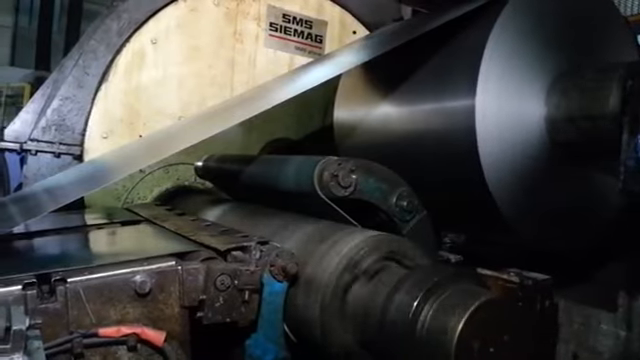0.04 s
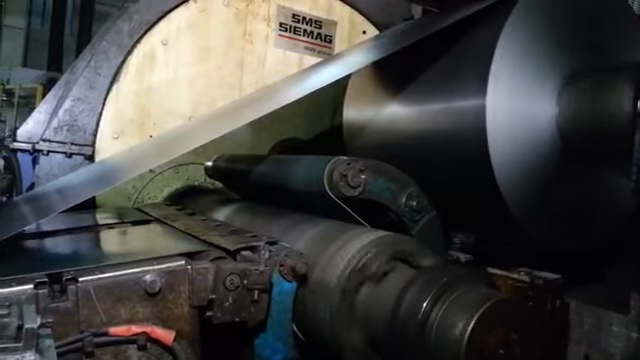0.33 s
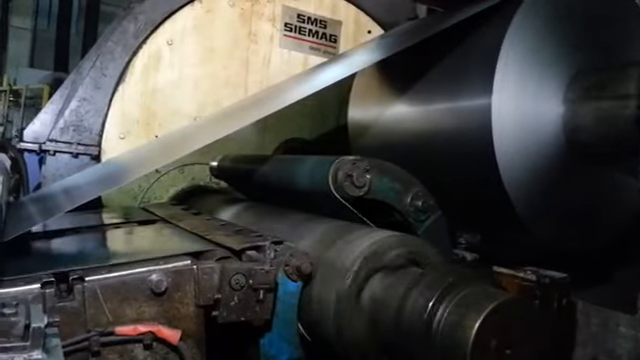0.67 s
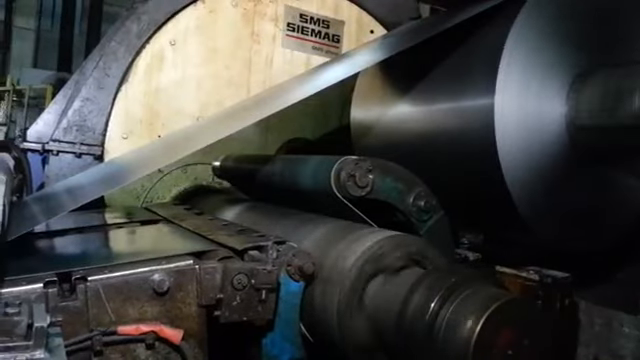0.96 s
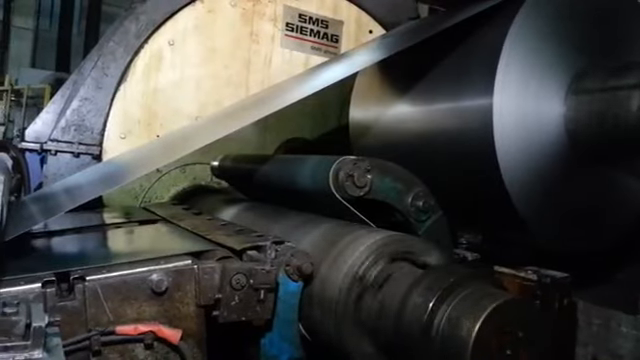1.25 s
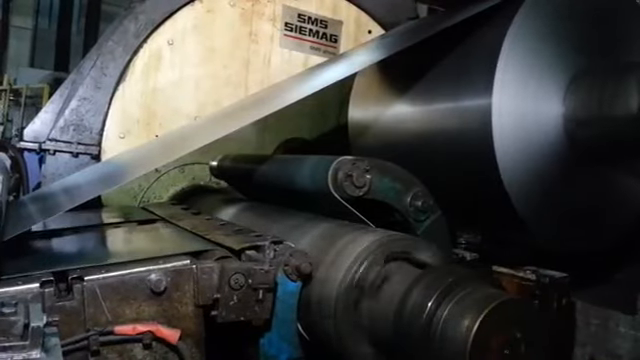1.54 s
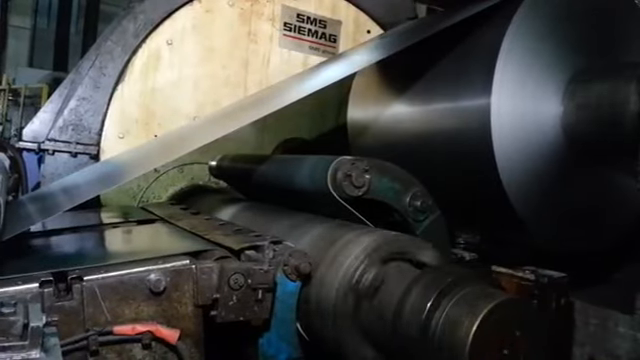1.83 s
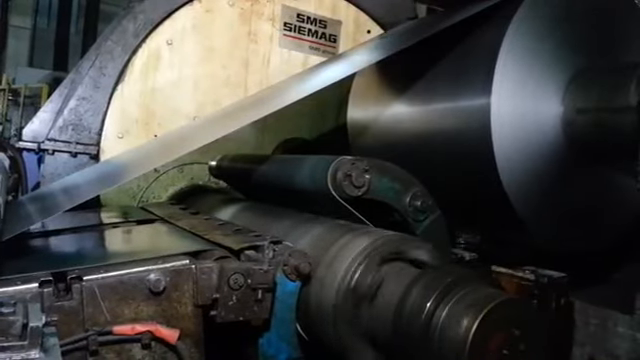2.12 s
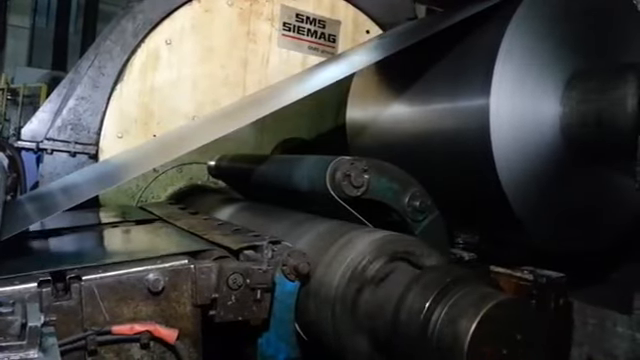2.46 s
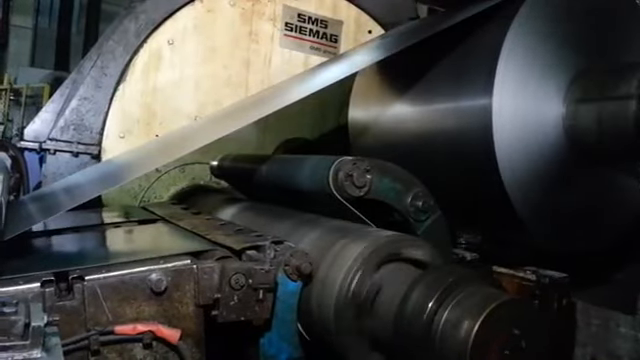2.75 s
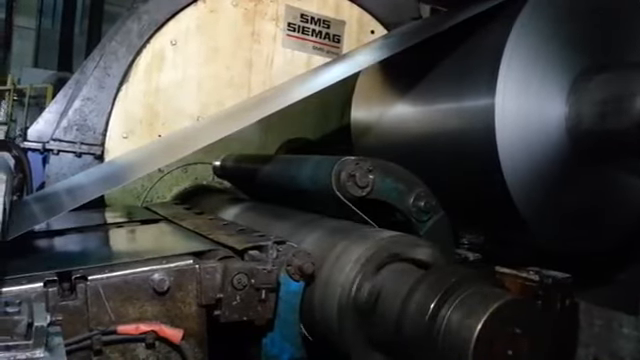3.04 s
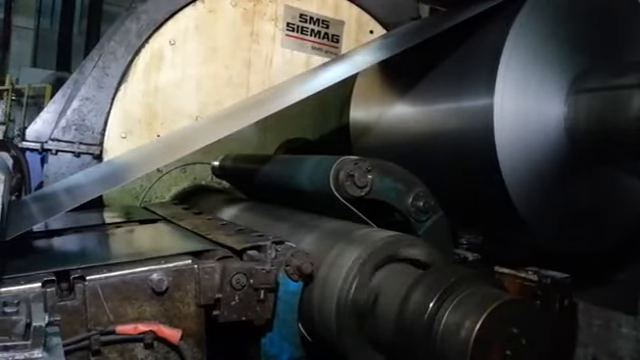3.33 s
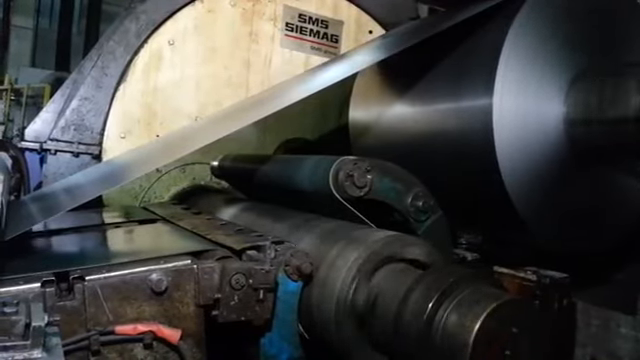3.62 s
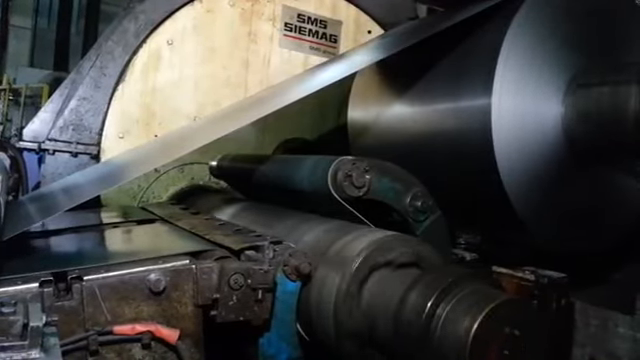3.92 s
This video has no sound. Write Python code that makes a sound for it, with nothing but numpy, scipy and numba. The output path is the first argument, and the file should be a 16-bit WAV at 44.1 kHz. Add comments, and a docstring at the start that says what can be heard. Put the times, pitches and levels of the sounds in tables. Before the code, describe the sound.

A large steel coiling machine runs with a constant, dense roar and a high hiss of sliding metal strip, both leaning to the right. Beneath them are a soft hum, a ringing frame, a few faint thumps and a gradually strengthening whine. In the last second or so, loud irregular wind gusts hit the microphone with hoarse little whistles and low thuds, and the machine ducks slightly under them.

```python
"""A steel strip winds onto a spinning coil in a mill hall. From the start the rollers roar, the frame
rings and the drive hums, while friction makes the strip sizzle to the right, swelling a little with
each turn. The gear whine grows with the load, and faint low thumps sound under the roar. At 5.4 s
the whine starts to recede; then gusts buffet the microphone ports, shedding eddies that rush and
whistle amid heavier thuds, and the gain control pushes the machine down under them."""
import sys
import numpy as np
from scipy import signal
from scipy.fft import irfft
from scipy.io import wavfile
from scipy.ndimage import uniform_filter1d, minimum_filter1d
from numba import njit

SR = 44100
rng = np.random.default_rng(int(sys.argv[2]) if len(sys.argv) > 2 else 0)


def waveform_to_disk(signal):
    """Save audio, clipped to [-1, 1], as 16-bit WAV at the path in sys.argv[1]."""
    frames = np.transpose(np.atleast_2d(signal))
    scaled = np.clip(frames, -1, 1) * 32767
    samples = np.round(scaled).astype(np.int16)
    wavfile.write(sys.argv[1], SR, samples)


N = 302967
TIME, FREQ = np.arange(N) / SR, np.fft.rfftfreq(N, 1 / SR) + 1e-3
PORT_LAG_S = 16.5 / SR  # sound from the right reaches the left microphone port this much later


# spectrum of the roller roar (frequency [Hz], relative density [dB])
ROAR_SPECTRUM = [(40, -85), (70, -72), (110, -55), (160, -29), (210, -13), (260, -4.5), (320, -7.5),
                 (500, -1.5), (800, -1), (1300, 3), (2000, 2), (2700, -1), (4000, 1.5), (5600, -30),
                 (6600, -23)]
# the roar at the two ports (frequency [Hz], coherence [0-1], left minus right [dB])
ROAR_STEREO = [(100, 0, 16), (264, 0.77, -6), (640, 0.6, -2.5), (960, 0.57, -3), (1700, 0.39, -1.5),
               (2680, 0.28, -4.5), (5000, 0.35, -3.5)]

def rollers(roar_db=-16.0, wander_db=0.89, direct_hz=850):
    """Rolling noise: the bass forms a diffuse field, the treble arrives partly direct from the right."""
    coherence, balance_db = over_freq(ROAR_STEREO)
    lag = PORT_LAG_S / (1 + (direct_hz / FREQ) ** 6)
    colour = undb(over_freq(ROAR_SPECTRUM)[0])
    roar = irfft(ports(coherence, lag) * colour * pan(balance_db), N)
    return level(roar, roar_db) * undb(wander_db * walk(27.0))


# strip sliding over the rolls (frequency [Hz], relative density [dB])
SIZZLE_SPECTRUM = [(2200, -39), (3200, -9), (3900, 3), (4500, 7), (5100, 4), (5900, -1.5), (6500, -20.5)]
# high treble hiss to the right (frequency [Hz], relative density [dB], left minus right [dB])
HISS_SPECTRUM = [(5270, -46, -4), (6170, -0.5, -11), (8700, -0.5, -8), (9700, -2, -10.5), (12000, -3, -5.5),
                 (13700, -5, 0), (14400, -32.5, -13)]

def strip(rub_db=-16.5, ease_db_per_s=0.18, coil_hz=2.6, turn_db=0.4, flutter_db=0.66):
    """Sliding friction: a sizzle flutters with tension and eases as the coil grows; a hiss follows it."""
    sizzle_colour = undb(over_freq(SIZZLE_SPECTRUM)[0])
    sizzle = irfft(ports(coherence=0.081, lag_s=PORT_LAG_S) * sizzle_colour, N) * pan(-10)
    hiss_db, balance_db = over_freq(HISS_SPECTRUM)
    hiss = irfft(ports(coherence=0.97) * undb(hiss_db) * pan(balance_db), N)
    turn = np.cos(2 * np.pi * coil_hz * (TIME - .12))
    rubbing = undb(rub_db - ease_db_per_s * TIME + turn_db * turn + flutter_db * walk(17))
    return rubbing * (level(sizzle, 0) + level(hiss, -4) * undb(0.46 * walk(7.9)))


# gusts (start [s], rise [s], hold [s], level [dB], lower edge [Hz], upper edge at full speed [Hz])
AIR_GUSTS = [ (5.581, 0.04, 0.19, -15, 398, 730), (5.657, 0.035, 0.025, -12.5, 680, 1380),
             (5.835, 0.02, 0.03, -14, 520, 950), (5.886, 0.0063, 0.038, -3.5, 534, 1060),
             (5.896, 0.012, 0.062, -7.5, 950, 1630), (6.06, 0.041, 0.095, -17, 448, 1130),
             (6.264, 0.022, 0.038, -0.5, 553, 1950), (6.285, 0.01, 0.018, -9, 1450, 2100),
             (6.405, 0.037, 0.041, -4.5, 606, 1940), (6.494, .006, 0.034, -5, 1700, 10000),
             (6.473, 0.014, 0.16, -7, 393, 4600), (6.626, 0.11, .2, -4, 335, 1520)]
# response of the port cavities to moving air (frequency [Hz], relative gain [dB])
PORT_RESPONSE = [(250, 2.5), (520, 4), (1000, 3), (1700, 1.5), (2700, 0), (4300, -3), (6000, -9),
                 (12000, -4)]
# wind at the two ports (frequency [Hz], coherence [0-1], left minus right [dB])
WIND_STEREO = [(300, 0.87, -1.5), (750, 0.67, 0.5), (1260, 0.52, 0.5), (3000, 0.4, 0), (9100, 0.7, -2)]

def wind(buffet_db=1.14, low_cut_hz=180, edge_exponent=0.13):
    """Turbulence at the ports: faster air sheds smaller eddies and so makes a brighter rush."""
    coherence, balance_db = over_freq(WIND_STEREO)
    colour = undb(over_freq(PORT_RESPONSE)[0])
    air = level(irfft(ports(coherence) * colour * pan(balance_db), N), 0)
    hz, t, bands = signal.stft(air, SR, nperseg=512)
    power = 0
    for start, rise, hold, db, low_hz, high_hz in AIR_GUSTS:
        speed = air_speed(t - start, rise, hold, high_hz)
        edge_hz = 1 + high_hz * speed ** edge_exponent
        band_share = np.average(eddies(FREQ, low_hz, high_hz) ** 2, weights=colour ** 2)
        gust = undb(db) * speed * eddies(hz[:, None] + 1, low_hz, edge_hz)
        power = power + gust ** 2 / band_share
    rush = signal.istft(bands * np.sqrt(power), SR, nperseg=512)[1][:, :N]
    low_cut = signal.butter(8, low_cut_hz, "high", fs=SR, output="sos")
    return signal.sosfilt(low_cut, rush * undb(buffet_db * walk(51)))


def air_speed(age, rise, hold, high_hz, surge_db=1, settle_s=0.012, sag_db_per_s=10.5):
    """Transient flow: a gust's relative speed rises, overshoots, sags and decays exponentially."""
    fall_s = 0.094 * (1400 / high_hz) ** 0.46  # bright gusts die sooner
    since_peak = np.maximum(age - rise, 0)
    sag = undb(surge_db * np.exp(-since_peak / settle_s) - sag_db_per_s * since_peak)
    decay = np.exp(-np.maximum(since_peak - hold, 0) / fall_s)
    return np.clip(age / rise, 0, 1) * sag * decay


def eddies(hz, low_hz, high_hz, peak_db=3, hiss_db=-40):
    """Eddy spectrum: a band with a shedding peak just under its upper edge and a faint hiss beyond."""
    lower_slope = 1 / np.sqrt(1 + (low_hz / hz) ** 5.12)
    upper_slope = 1 / np.sqrt(1 + (hz / high_hz) ** 5.48)
    shedding = undb(peak_db * np.exp(-(np.log(hz / (0.95 * high_hz)) / 0.051) ** 2))
    return lower_slope * (upper_slope * shedding + undb(hiss_db))


# tones at the ports (start [s], length [s], level [dB], first pitch [Hz], last pitch [Hz])
VORTEX_TONES = [ (5.67, 0.056, -17, 695, 686), (5.758, 0.08, -26, 625, 477), (5.885, 0.071, -16, 613, 585),
                (5.9, 0.113, -11, 800, 890), (6.07, 0.064, -19, 950, 1030), (6.283, 0.041, -4, 1840, 2020),
                (6.275, 0.04, -3, 1660, 1640), (6.305, 0.057, -8, 1362, 1330),
                (6.411, 0.077, -13, 1165, 1274), (6.46, 0.061, -9, 703, 636), (6.70, 0.045, -10, 516, 540),
                (6.724, 0.047, -7, 989, 1072)]

def whistles(hoarseness=0.47, hoarse_hz=70):
    """Vortex lock-in: eddies briefly shed in step, giving hoarse tones that swell, glide and fade."""
    rough = roughness(hoarseness, hoarse_hz)
    out = np.zeros((2, N))
    for start, length, db, first_hz, last_hz in VORTEX_TONES:
        span = (TIME > start) & (TIME < start + length)
        progress = (TIME[span] - start) / length
        pitch_hz = first_hz + (last_hz - first_hz) * progress
        phase = 2 * np.pi * (np.cumsum(pitch_hz) / SR + rng.random())
        tone = np.real(np.exp(1j * phase) * rough[:, span])
        out[:, span] += undb(db) * np.sin(np.pi * progress) * tone
    return out


def gear_mesh(mesh_hz=800, wobble_hz=0.27, start_db=-32.5, full_load_s=5.4):
    """Tooth meshing: a whine, modulated by uneven teeth, grows with the load and then recedes."""
    growth_db_per_s, ease_db_per_s = 0.8, 8
    phase = 2 * np.pi * np.cumsum(mesh_hz + wobble_hz * walk(6.4)) / SR
    whine = np.real(np.exp(1j * phase) * roughness(depth=0.62, rate_hz=22))
    growth_db = growth_db_per_s * np.minimum(TIME, full_load_s)
    ease_db = ease_db_per_s * np.maximum(TIME - full_load_s, 0)
    return level(whine, start_db) * undb(growth_db - ease_db) * pan(-4)


# modes of frame and gears (frequency [Hz], half-width [Hz], relative level [dB], left minus right [dB])
FRAME_MODES = [(257, 16.5, -35, -3), (408, 11, -39, -3), (506, 16, -39.5, -4), (660, 16, -39.5, -4),
               (1570, 69, -40.5, -13), (1860, 11, -41.5, -16), (2040, 25, -33.5, 5)]

def frame(ring_db=-33.0, unrest_db=3.0, lowest_hz=190):
    """Forced resonance: rolling contact drives narrow modes unevenly; deep bass radiates poorly."""
    modes = sum(undb(db) * pan(pan_db) / np.sqrt(width) / (1 + ((FREQ - hz) / width) ** 2)
                for hz, width, db, pan_db in FRAME_MODES)
    radiation = 1 / (1 + (lowest_hz / FREQ) ** 4)
    coherence = over_freq(ROAR_STEREO)[0]
    ringing = irfft(ports(coherence) * modes * radiation, N)
    return level(ringing, ring_db) * undb(unrest_db * walk(14))


# drive hum and a close cluster of gear tones (frequency [Hz], level [dB], left minus right [dB])
DRIVE_TONES = [(261.5, -46.5, 1), (420, -41, -1), (1496, -50, -7), (1571, -41, -8), (1582, -41, -10),
               (1590, -46, 0)]

def hum(fade_db=0.5):
    """Beating: steady drive tones, the close ones interfering, each slowly swelling and fading."""
    out = 0
    for hz, db, pan_db in DRIVE_TONES:
        tone = np.sqrt(2) * np.sin(2 * np.pi * (hz * TIME + rng.random()))
        out = out + tone * undb(db + fade_db * walk(1.4)) * pan(pan_db)
    return out


# brief low thuds (time [s], level [dB], left minus right [dB])
LOW_THUDS = [(0.36, -44, -6), (0.53, -42, -6), (1.79, -46, -6), (2.1, -48, -6), (2.74, -50, -6),
             (3.83, -43, -6), (5.615, -43, -6), (5.985, -44, -6), (6.47, -25, 8), (6.521, -30, -6),
             (6.63, -36, -9), (6.82, -41, -11)]

def thuds(thud_hz=70, decay_s=0.0092):
    """Damped oscillation: faint low thumps under the roar, heavier low thuds during the gusts."""
    out = 0
    for start, db, pan_db in LOW_THUDS:
        age = np.clip(TIME - start, 0, .5)
        swing = np.sin(2 * np.pi * thud_hz * age) * np.exp(-age / decay_s)
        out = out + undb(db) * swing * pan(pan_db)
    return out


def undb(db):
    """Decibels to amplitude ratio."""
    return 10 ** (np.asarray(db) / 20)


def level(x, db):
    """Scaling to an rms level."""
    return x * undb(db) / np.sqrt(np.mean(x ** 2))


def over_freq(rows):
    """Interpolation of a table's columns on a log-frequency axis."""
    hz, *columns = np.transpose(rows)
    return [np.interp(np.log(FREQ), np.log(hz), c) for c in columns]


def pan(db):
    """Left and right gains for a level difference, left minus right."""
    return undb(np.array([[.5], [-.5]]) * db)


def white(count):
    """Spectra of independent white noises."""
    return rng.standard_normal((count, len(FREQ))) + 1j * rng.standard_normal((count, len(FREQ)))


def ports(coherence, lag_s=0):
    """Partial coherence: two noise spectra with a shared part, delayed on the left, and a diffuse part."""
    delay = np.exp(-2j * np.pi * FREQ * lag_s * np.array([[1], [0]]))
    return np.sqrt(coherence) * white(1) * delay + np.sqrt(1 - coherence) * white(2)


def walk(rate_hz):
    """Low-pass noise: a smooth random wander of unit rms."""
    return level(irfft(white(1)[0] * np.exp(-(FREQ / rate_hz) ** 2), N), 0)


def roughness(depth, rate_hz):
    """Random modulation of amplitude and phase, independent at each port."""
    return 1 + depth * np.array([walk(rate_hz) + 1j * walk(rate_hz) for port in range(2)])


@njit
def follow(power, attack, release):
    """Envelope detection: smoothed power that rises fast and falls slowly."""
    out, envelope = np.empty(len(power)), 0.
    for i in range(len(power)):
        envelope += (power[i] - envelope) * (attack if power[i] > envelope else release)
        out[i] = envelope
    return out


def limit(x, ceiling=.93, size=71):
    """Look-ahead limiting: the gain eases down just before each peak."""
    safe_gain = 1 / np.maximum(np.abs(x).max(axis=0) / ceiling, 1)
    held_gain = minimum_filter1d(safe_gain, 2 * size)
    return x * uniform_filter1d(uniform_filter1d(held_gain, size), size)


def scene():
    """Superposition: the running machine, the moving air and the low thuds add together."""
    machine = rollers() + strip() + frame() + hum() + gear_mesh()
    return machine + wind() + whistles() + thuds()


def record(dry, threshold_db=-11.5, squeeze=0.31, attack_s=0.0052, release_s=0.026):
    """Compression: the gain ducks under the gusts; peaks are limited, deep bass and top are cut."""
    power = follow(np.mean(dry ** 2, axis=0), 1 / (attack_s * SR), 1 / (release_s * SR))
    gain = np.maximum(np.sqrt(power) / undb(threshold_db), 1) ** -squeeze
    gain = uniform_filter1d(uniform_filter1d(gain, size=300), size=300)
    bass_cut = signal.butter(2, 90, "high", fs=SR, output="sos")
    top_cut = signal.ellip(12, .1, 70, 14650, fs=SR, output="sos")
    return signal.sosfilt(top_cut, signal.sosfilt(bass_cut, limit(dry * gain)))


dry = scene()
out = record(dry)
waveform_to_disk(out)
```